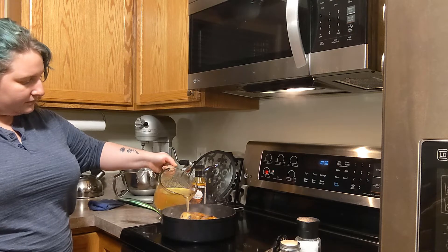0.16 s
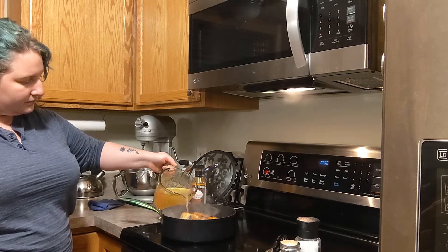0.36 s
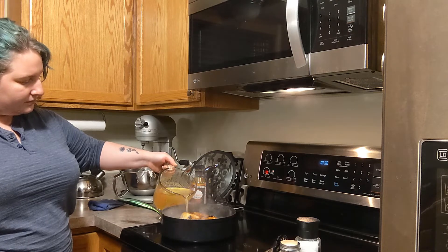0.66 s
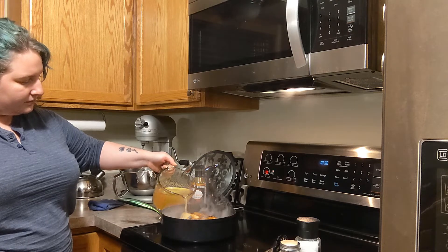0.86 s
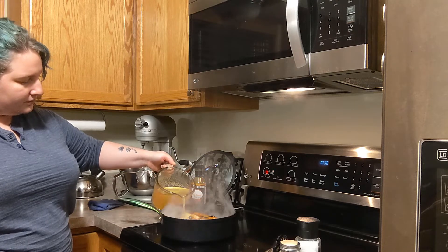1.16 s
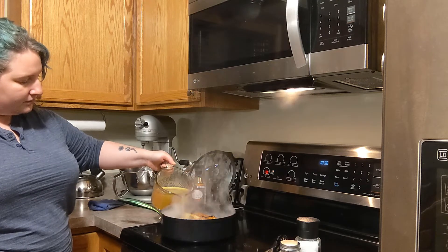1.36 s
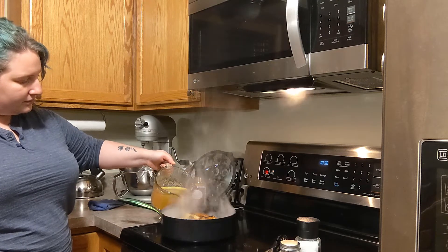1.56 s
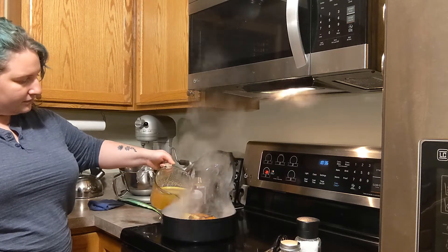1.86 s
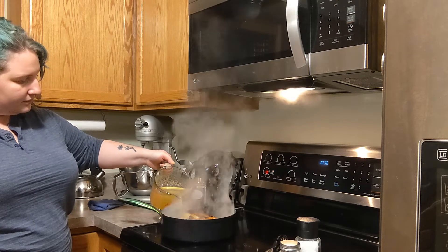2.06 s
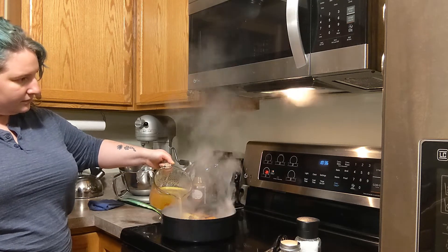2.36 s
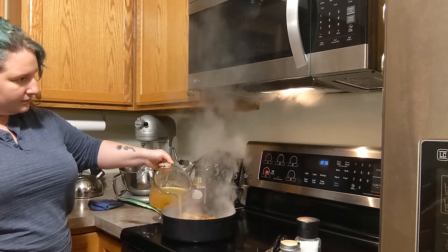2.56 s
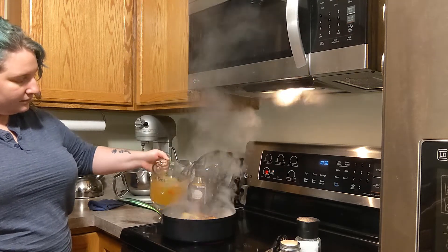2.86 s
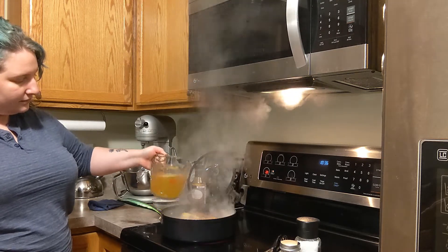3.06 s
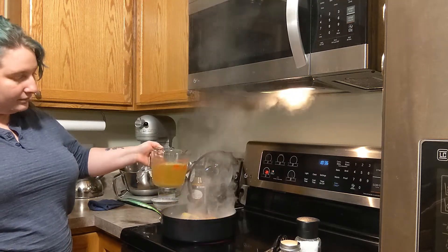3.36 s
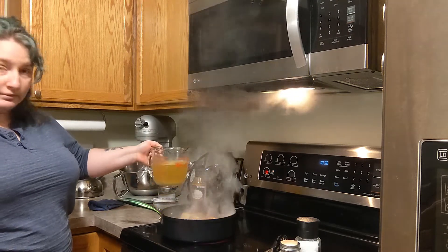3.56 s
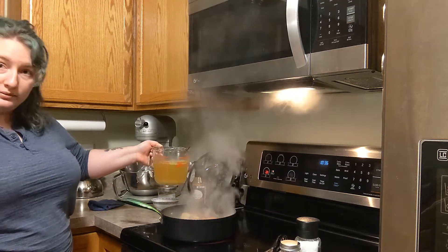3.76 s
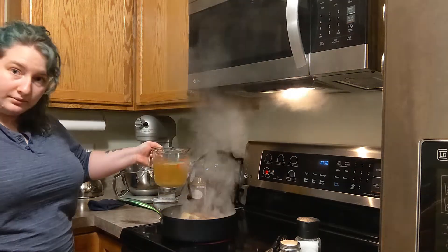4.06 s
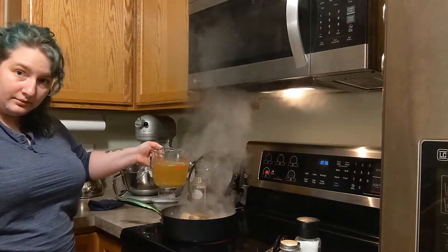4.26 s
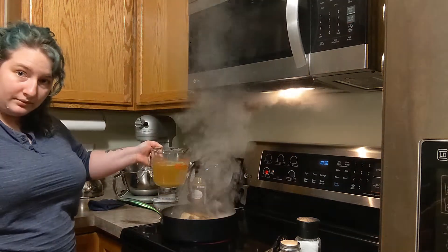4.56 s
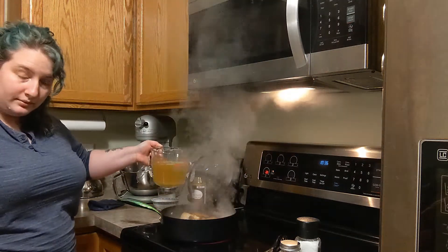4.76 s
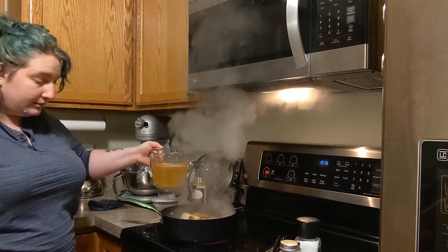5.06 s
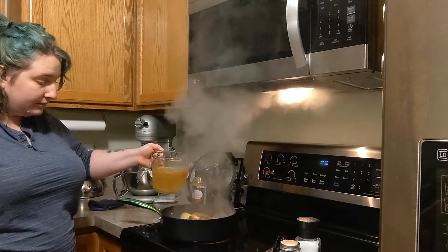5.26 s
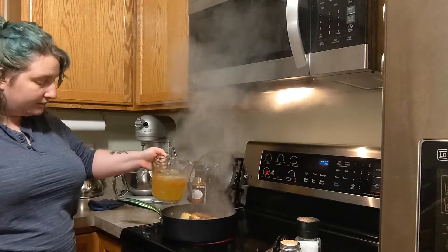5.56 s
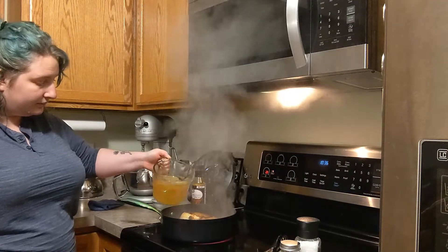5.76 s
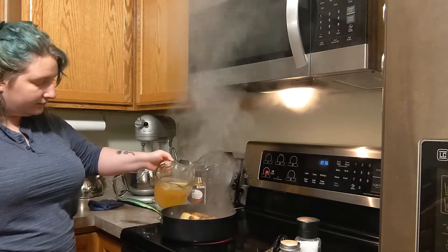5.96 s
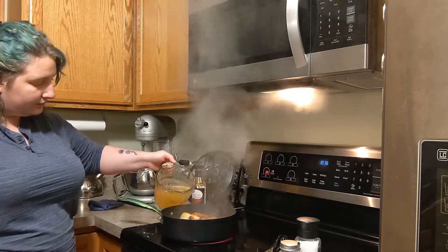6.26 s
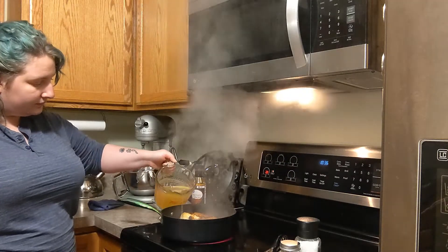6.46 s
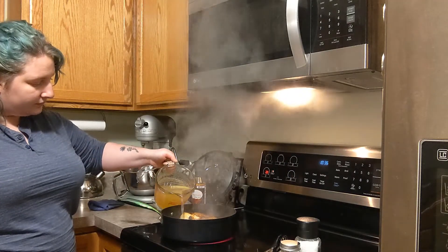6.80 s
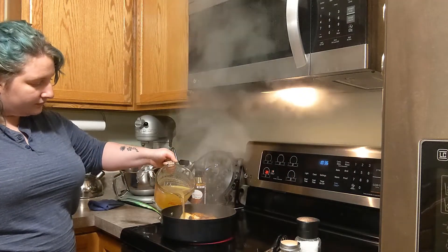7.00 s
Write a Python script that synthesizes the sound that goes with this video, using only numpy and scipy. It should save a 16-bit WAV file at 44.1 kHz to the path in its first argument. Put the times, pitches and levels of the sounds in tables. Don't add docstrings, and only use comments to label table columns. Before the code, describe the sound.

Broth poured onto seared meat in a hot skillet hisses fiercely, swells, then eases into a bubbling simmer, with a faint refrigerator hum behind.

```python
import sys
import numpy as np
from scipy import signal
from scipy.fft import rfft, irfft, next_fast_len
from scipy.io import wavfile

SR = 44100
rng = np.random.default_rng(int(sys.argv[2]) if len(sys.argv) > 2 else 0)


def how_loud(loudness_db):
    steps = np.asarray(loudness_db, float) / 20
    return 10 ** steps


def store_pcm(level_fs):
    pcm = np.round(np.clip(level_fs, -1, 1) * 32767).astype(np.int16)
    wavfile.write(sys.argv[1], SR, np.atleast_2d(pcm).T)


N = 314521
CONTROL_STEP = 40


def rms_one(x):
    return x / np.sqrt(np.mean(x ** 2) + 1e-20)


def at_hz(points, hz):
    table_hz, values = np.transpose(points)
    return np.interp(np.log(hz), np.log(table_hz), values)


def at_samples(slow):
    return np.interp(np.arange(N) / CONTROL_STEP, np.arange(len(slow)), slow)


def drift(rate_hz):
    pole = np.exp(-2 * np.pi * rate_hz * CONTROL_STEP / SR)
    settle = 2000
    noise = rng.standard_normal(N // CONTROL_STEP + 2 + settle)
    slow = signal.lfilter([1], [1, -2 * pole, pole * pole], noise)[settle:]
    return rms_one(slow - slow.mean())


def swing(rows):
    times_s, levels_db = np.transpose(rows)
    curve = np.interp(np.arange(N // CONTROL_STEP + 2) * CONTROL_STEP / SR, times_s, levels_db)
    return curve - curve.mean()


def swell(hz):
    # time_s, level_db
    flash = [(0.0, -30), (0.16, -29.5), (0.25, -28.5), (0.75, -26.5), (1.1, -25.5), (1.39, -26),
             (1.6, -25.5), (1.9, -26.5), (2.4, -26), (2.7, -25.5), (3.3, -25.5), (3.6, -26), (4.25, -26),
             (4.48, -25), (4.75, -26.5), (5.4, -27.5), (6.0, -30), (7.13, -32)]
    # time_s, level_db
    pool = [(0.0, -44), (0.5, -42), (1.0, -40.5), (1.8, -38.5), (2.9, -37.5), (3.8, -37), (4.9, -37),
            (5.4, -36.2), (7.13, -37.5)]
    # pitch_hz, flash_share (of its swing), pool_share (of its swing)
    follows = [(670, 0.39, 0.79), (1340, -0.1, 1.0), (1800, 0.029, 0.39), (2600, 0.5, 0.6),
               (4500, 0.6, 0.24), (7800, 0.93, 0.15), (13000, 1.05, -0.16)]
    shares = np.array(follows)
    flash_share = at_hz(shares[:, [0, 1]], hz)
    pool_share = at_hz(shares[:, [0, 2]], hz)
    return flash_share * swing(flash) + pool_share * swing(pool)


def bursts(per_s, spread_db, wash):
    shape = (2, 3, N)
    born = rng.random(shape) < per_s / SR
    size_db = spread_db * np.minimum(rng.exponential(1, shape), 5)
    size = how_loud(size_db) * rng.choice([-1, 1], shape)
    return np.sqrt(1 - wash) * rms_one(born * size) + np.sqrt(wash) * rng.standard_normal(shape)


def coloured(pops, colour, flicker_db, together_db, swells=True):
    # pitch_hz, share (0-1)
    direct_share = [(50, 0.88), (130, 0.96), (300, 0.75), (550, 0.7), (690, 0.87), (880, 0.46), (1050, 0.7),
                    (1400, 0.46), (2200, 0.3), (3000, 0.04), (9000, 0.13), (15000, 0.16)]
    left_lag_s = 1.3e-4
    out = 0
    together = together_db * (drift(10.6) + drift(24))
    low, top = colour[0][0], min(colour[-1][0], 0.4 * SR)
    edges = np.geomspace(low, top, round(3 * np.log2(top / low)) + 1)
    for k, (a, b) in enumerate(zip(edges, edges[1:])):
        band = signal.butter(2, [a, b], "band", fs=SR, output="sos")
        paths = signal.sosfilt(band, pops[k % 2])
        hz = np.sqrt(a * b)
        share = at_hz(direct_share, hz)
        level_db = at_hz(colour, hz) + together + flicker_db * drift(11.0)
        if swells:
            level_db += swell(hz)
        out = out + at_samples(how_loud(level_db)) * paths * np.sqrt([[share], [1 - share], [1 - share]])
    direct, left_room, right_room = out
    size = next_fast_len(N + 64)
    turn = np.exp(-2j * np.pi * np.arange(size // 2 + 1) * left_lag_s * SR / size)
    late = irfft(rfft(direct, size) * turn, size)[:N]
    return rms_one(np.array([late + left_room, direct + right_room]))


def resonate(x, peaks):
    out = []
    for side, sound in enumerate(x):
        sos = []
        for hz, width_hz, *side_db in peaks:
            g = how_loud(side_db[side] / 2)
            damp = np.tan(np.pi * width_hz / SR)
            middle = -2 * np.cos(2 * np.pi * hz / SR)
            top = [1 + damp * g, middle, 1 - damp * g]
            bottom = [1 + damp / g, middle, 1 - damp / g]
            sos.append(np.array(top + bottom) / bottom[0])
        out.append(signal.sosfilt(sos, sound))
    return np.array(out)


def steam():
    # pitch_hz, level_db (per Hz)
    hiss_colour = [(2000, -22), (3000, -16), (4000, -4), (6000, -0.5), (8000, -0.5), (11000, 2.5),
                   (16000, -0.5)]
    pops = bursts(per_s=9000, spread_db=4.5, wash=0.83)
    return how_loud(-24) * coloured(pops, hiss_colour, flicker_db=0.53, together_db=0.28)


def boil():
    # pitch_hz, level_db (per Hz)
    bubble_colour = [(200, -19), (400, -20), (600, -10), (900, -6), (1300, -0.5), (2000, -1.5), (3000, -1),
                     (4000, -1), (6000, -19)]
    pops = bursts(per_s=3000, spread_db=3.0, wash=0.91)
    return how_loud(-30.5) * coloured(pops, bubble_colour, flicker_db=0.84, together_db=0.29)


def pan(x):
    # pitch_hz, width_hz, left_db, right_db
    pan_peaks = [(442, 20, -5, -3), (461.3, 14.5, 10.5, 11), (489, 13, -9, -12), (524, 11, 5.5, 1),
                 (584, 24, 6, 4), (635, 15.5, -17.5, -1.5), (666, 28, 10.5, 7.5), (712, 29, 6, 5),
                 (720, 10, -1, 0), (750, 30, 2, -1.5), (837, 13, 2, -3), (930, 49, -6, -4.5),
                 (993, 63, 1.5, 3), (1080, 86, -2.5, -2.5), (1217, 103, 0.5, 6.5), (1267, 36, 6, 1),
                 (1327, 48, -6.5, -5.5), (1357, 35, 5.5, 6), (1414, 47, 1, 6), (1568, 88, -2.5, -6.5),
                 (1684, 110, 4.5, 2.5), (1836, 27, 4.5, 0.5), (1770, 50, 0.5, 2.5), (1934, 74, 3.5, 6),
                 (2090, 82, -1, -6.5), (2149, 76, 2, 11), (2292, 81, 1, 5), (2360, 80, 4.5, 6),
                 (2886, 120, 1.5, 3.5), (3860, 170, 3.5, -2)]
    # pitch_hz, width_hz, left_extra_db, right_extra_db
    dry_peaks = [(1090, 50, -2.5, 7), (1715, 47, 9.5, 0.5), (1730, 46, 2.5, 3.5), (1790, 120, -9.5, -0.5),
                 (2050, 100, -2.5, -6), (2380, 57, 5.5, -6)]
    # pitch_hz, width_hz, left_extra_db, right_extra_db
    simmer_peaks = [(1100, 100, 2, -1), (1240, 35, -5, 2), (1370, 60, 4, 2.5), (1500, 100, -1.5, -0.5),
                    (1780, 60, -3, -1)]
    t = np.arange(N) / SR
    bare = np.interp(t, [1.3, 3.1], [1, 0])
    simmering = np.interp(t, [5.1, 5.27], [0, 1])
    wet = resonate(x, pan_peaks)
    steady = (1 - bare - simmering) * wet
    return steady + bare * resonate(wet, dry_peaks) + simmering * resonate(wet, simmer_peaks)


def reflect(x):
    # delay_s, comb_top_hz, level_db
    first_echo = [
        (1.015e-3, 6510, -11.5),
        (1.028e-3, 7110, -13.5),
    ]
    low_hz, high_hz = 4100, 9100
    scatter_db, scatter_t60_s = -15.5, 0.14
    size = next_fast_len(N + 2048)
    hz = np.arange(size // 2 + 1) * SR / size
    above = 1 / (1 + (low_hz / (hz + 1)) ** 4)
    band = above / (1 + (hz / high_hz) ** 8)
    comb = []
    for delay_s, top_hz, db in first_echo:
        comb.append(1 + how_loud(db) * band * np.exp(-2j * np.pi * delay_s * (hz - top_hz)))
    late = np.zeros((2, 2048))
    at = rng.integers(90, 2048, (2, 24))
    echoes = how_loud(scatter_db - 60 * at / SR / scatter_t60_s) * rng.choice([-1, 1], at.shape)
    np.put_along_axis(late, at, echoes, axis=1)
    return irfft(rfft(x, size) * (comb + above * rfft(late, size)), size)[:, :N]


def refrigerator():
    # pitch_hz, level_db (per Hz)
    rumble_colour = [(25, -20), (42, -21), (58, -5.5), (100, -10.5), (200, -8), (300, -9), (420, -10.5),
                     (600, -31)]
    # pitch_hz, width_hz, left_db, right_db
    standing_waves = [(54.7, 6.4, 5, 8.5), (62, 6, -1, -4), (84, 8.8, -11, -15), (106.8, 35, 9, 11.5),
                      (137, 7, -5, -4.5), (144.3, 8.7, 7.5, 3), (163.3, 8.7, -11, -11),
                      (177.6, 19, 4.5, 7.5), (213.5, 30, -11, -5.5), (337.5, 8, 5, 7), (358, 29, -4, -10)]
    hum_hz, hum_db, rumble_db = 48.4, -59, -52.5
    level = at_samples(how_loud(hum_db + 0.8 * drift(1.2)))
    tone = np.sqrt(2) * level * np.sin(2 * np.pi * hum_hz * np.arange(N) / SR)
    noise = rng.standard_normal((2, 3, N))
    rumble = coloured(noise, rumble_colour, flicker_db=0.5, together_db=1.1, swells=False)
    return tone + how_loud(rumble_db) * resonate(rumble, standing_waves)


def gurgles():
    # time_s, pitch_hz, length_s, level_db
    singing_bubbles = [(3.048, 2330, 0.021, -30), (3.04, 2210, 0.024, -38), (3.073, 2260, .02, -33),
                       (3.255, 1275, 0.022, -34), (4.652, 1390, 0.054, -36.5), (5.772, 1390, .04, -36),
                       (6.029, 1367, 0.076, -36.5), (6.14, 1840, .025, -38), (6.23, 1650, .03, -39),
                       (6.286, 678, 0.06, -40), (6.591, 1425, 0.037, -35.5), (6.939, 1383, 0.047, -37)]
    out = np.zeros(N)
    for s, hz, length_s, db in singing_bubbles:
        t = np.arange(-1.5 * length_s, 1.5 * length_s, 1 / SR)
        start = round((s - 1.4 * length_s) * SR)
        tone = np.sin(2 * np.pi * hz * (t + 0.015 * t ** 2 / length_s))
        out[start:start + len(t)] += how_loud(db + 1) * np.exp(-(2 * t / length_s) ** 2) * tone
    return out * how_loud([[-1], [1]])


def footfall():
    # start_s, pitch_hz, level_db, t60_s
    floor_rings = [
        (6.4, 130, -34, 0.14),
        (6.41, 52, -40, 0.24),
    ]
    out = np.zeros(N)
    for start_s, hz, db, t60_s in floor_rings:
        t = np.maximum(np.arange(N) / SR - start_s, 0)
        rise = 1 - np.exp(-t / 0.015)
        out += how_loud(db - 60 * t / t60_s) * rise * np.sin(2 * np.pi * hz * t)
    return out


def scene():
    skillet = pan(steam() + boil()) + gurgles()
    return reflect(skillet) + refrigerator() + footfall()


def roll_off(x):
    return signal.sosfilt(signal.butter(12, 15750, fs=SR, output="sos"), x)


def record(dry):
    # pitch_hz, width_hz, left_db, right_db
    port_peaks = [(7010, 340, 2.5, 3.5), (9050, 250, 1, 0), (10670, 1530, -4.5, -6.5),
                  (12000, 800, -2.5, 1), (13800, 1700, 1.5, 4), (15100, 1400, 4.5, 0), (15680, 250, 2, 0)]
    mix = resonate(dry, port_peaks)
    return roll_off(mix)


dry = scene()
out = record(dry)
store_pcm(out)
```